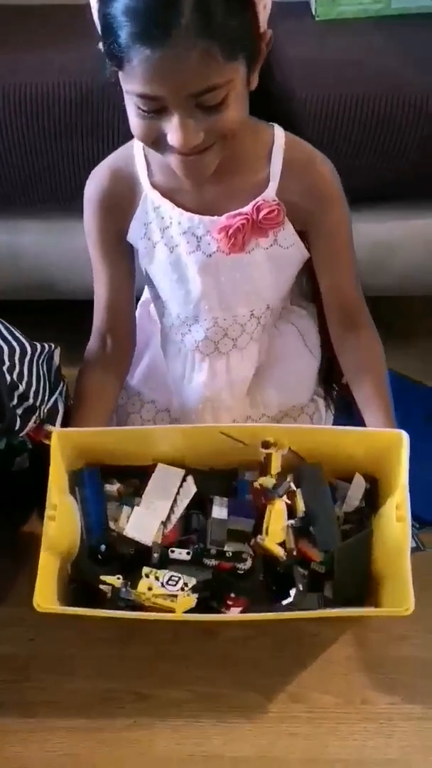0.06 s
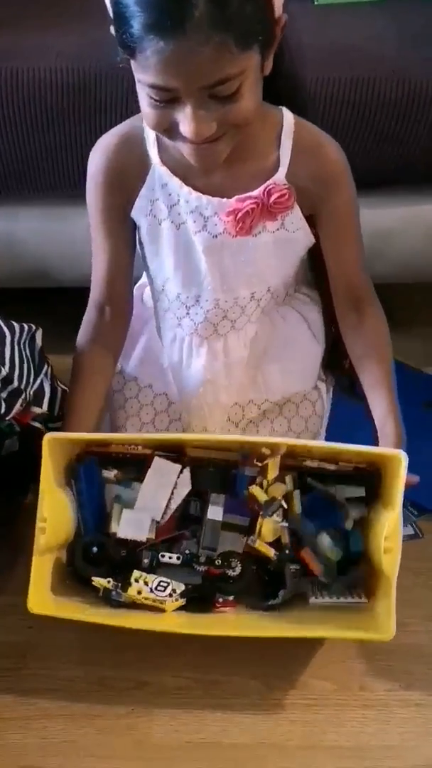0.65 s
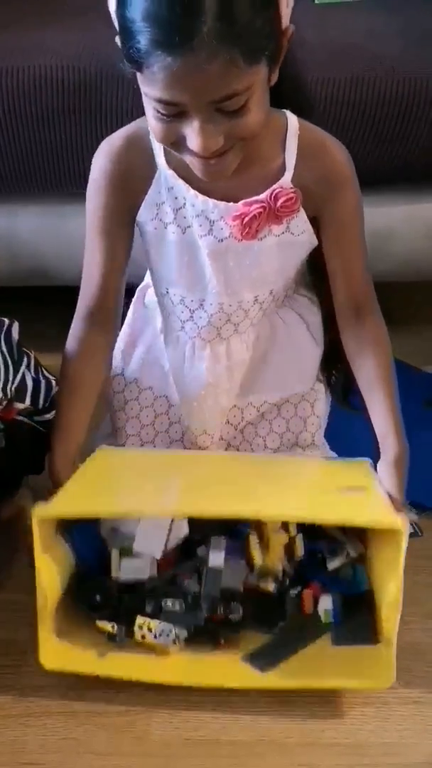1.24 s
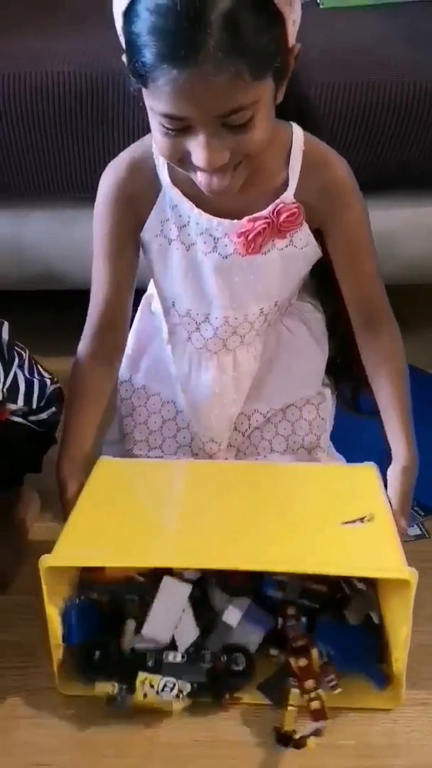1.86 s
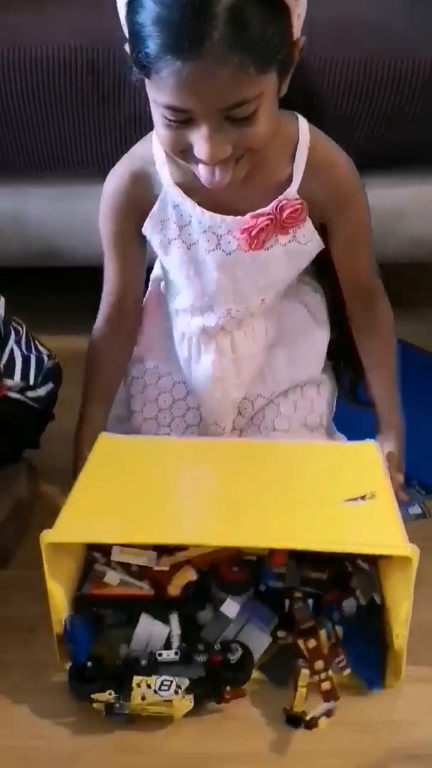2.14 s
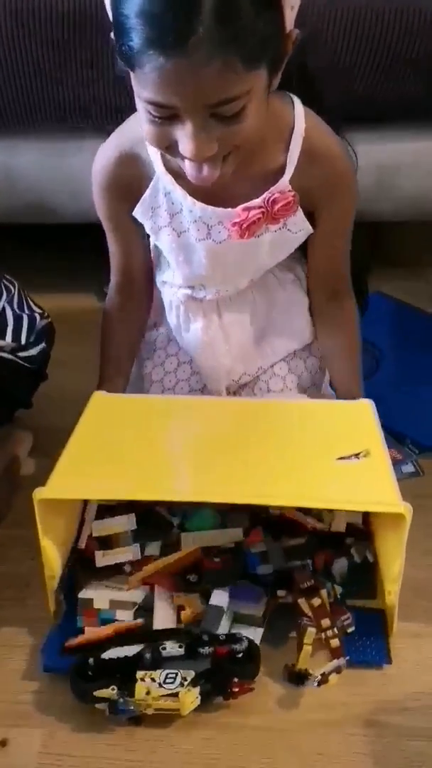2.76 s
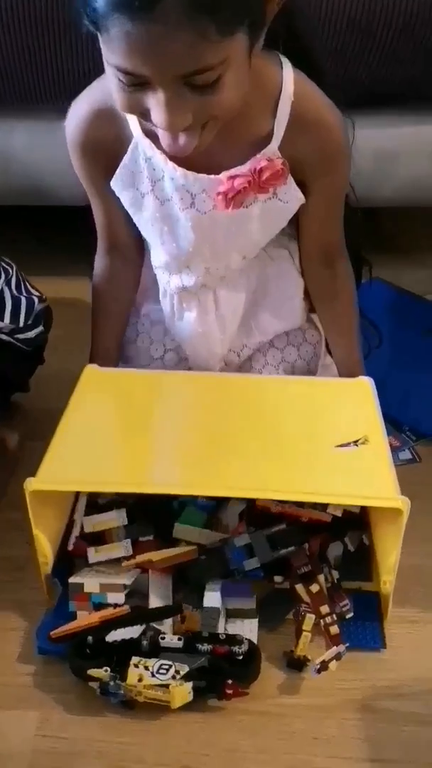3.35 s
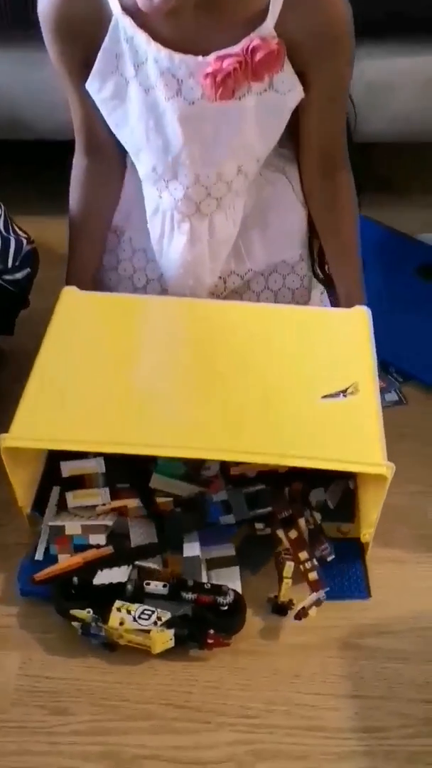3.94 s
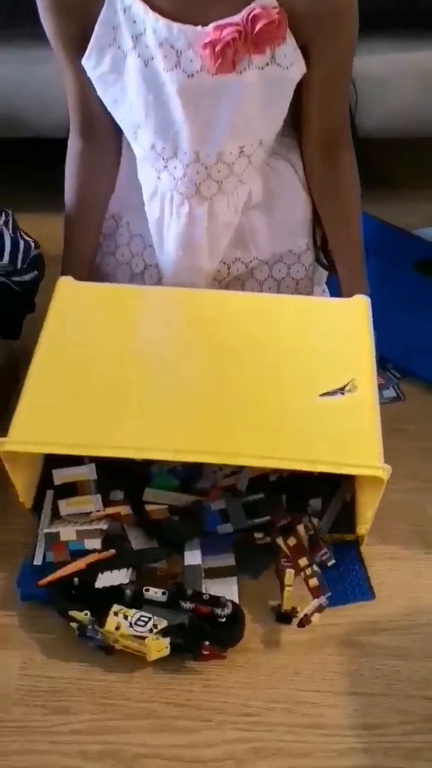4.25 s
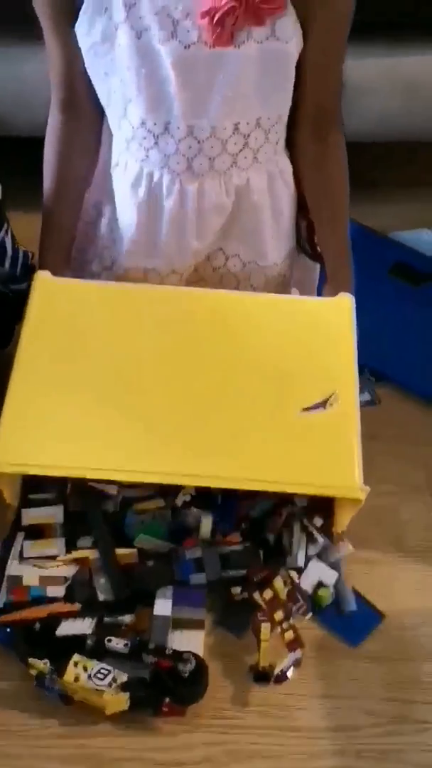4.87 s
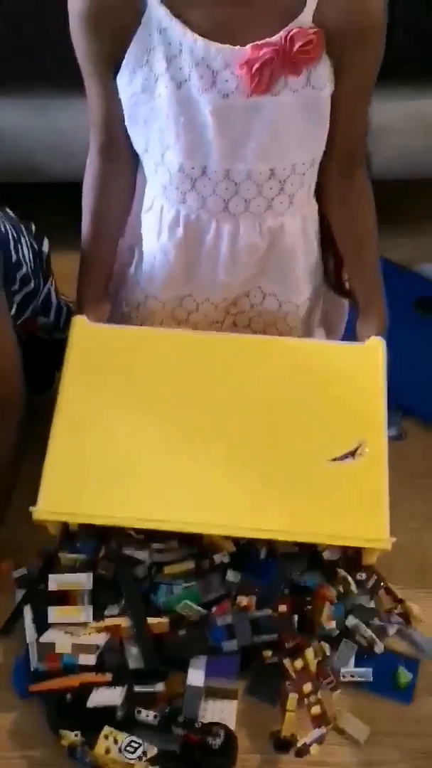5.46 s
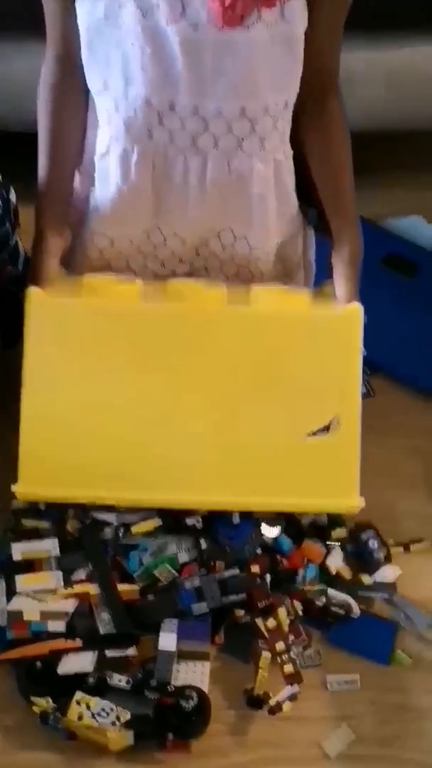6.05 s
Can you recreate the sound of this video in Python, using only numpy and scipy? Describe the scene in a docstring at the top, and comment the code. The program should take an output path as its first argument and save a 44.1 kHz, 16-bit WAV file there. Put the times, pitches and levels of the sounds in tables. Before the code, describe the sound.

Small plastic toy bricks rattle in a tipped plastic box, then clatter onto a wooden floor in two waves.

```python
"""Toy bricks slide out of a tipped plastic storage box and pour onto a wooden floor.
Every collision gives a hollow clack and a bright tick, drums on the box, and knocks on its wall and
on the floorboards. Each of these is a short burst of noise mixed with a few fading tones.
Some pieces ring on. The box rumbles and bumps in the hands, and a small living room
answers with a short echo over a faint hush."""
import sys
import numpy as np
from scipy import signal
from scipy.fft import rfft, irfft, next_fast_len
from scipy.io import wavfile

SR = 44100
rng = np.random.default_rng(int(sys.argv[2]) if len(sys.argv) > 2 else 0)


def transcribe(u):
    """Save the signal u as a 16-bit wav file named by the first command-line argument.

    u: samples, shape (n,) or (channels, n), limited to [-1, 1]; the rate is SR.
    q: integer samples, one column per channel.
    """
    v = np.clip(np.atleast_2d(u).T, -1, 1)
    q = np.round(v * 32767).astype(np.int16)
    wavfile.write(sys.argv[1], SR, q)


N = 269451
T = np.arange(N) / SR

# Tone colours of the box: its drumming, the hollow knock of its wall and its deep rumble.
# Each row: frequency in Hz, level in dB.
DRUM_SPECTRUM = [(60, -20), (100, -12), (165, -1.5), (230, -1), (290, 3.5), (340, 2), (420, -3),
                 (600, -23.5), (1000, -72.5)]
WALL_SPECTRUM = [(250, -39), (450, -9), (640, -3), (900, 4.5), (1300, -6), (1600, -18.5), (3000, -29)]
RUMBLE_SPECTRUM = [(10, 2), (25, -9), (45, -4.5), (70, -7), (110, -7), (180, -7), (400, -34), (1000, -79)]


def pour(parts, extra_per_s=130, least_per_s=160, moving_share=0.7, rebound_db=-1.5, contacts=3):
    """Collisions crowd together as the heap slides faster; each piece bounces in ever shorter hops."""
    flow_db = heap_levels(T)[0]
    per_s = least_per_s + extra_per_s * gain_of(0.5 * (flow_db - flow_db.max()))
    hits = np.flatnonzero(rng.random(N) < per_s / SR)  # the sample at which each collision starts
    hit_s = hits / SR
    surge_db = 0.7 * wander(13)[hits]  # the flow comes in uneven surges
    levels_db = part_levels(hit_s, *heap_levels(hit_s)) + surge_db
    weight, height, choice = rng.random((N, 3))[hits].T
    weight_db = 1.5 * np.minimum(-np.log1p(-weight), 4)  # many light blows, a few heavy ones
    which = (2 * hits / N + moving_share * choice) % 1  # only some pieces are moving at any time
    hop = np.arange(contacts)
    times = hit_s[:, None] + (0.003 + 0.014 * height[:, None]) * hop ** 0.8
    hop_sizes = gain_of(rebound_db * hop)
    hop_sizes /= np.linalg.norm(hop_sizes)
    window = np.hanning(int(0.172 * SR))
    out = np.zeros((2, N))
    for part, level_db, trim_db in zip(parts, levels_db, (-1.58, -1.19, -0.63, -3.46, -0.52)):
        sizes = gain_of(weight_db + 2.5 * rng.standard_normal(N)[hits])
        # the energy set free at each moment is shared among the collisions near it
        power = signal.oaconvolve(np.bincount(hits, sizes ** 2, N), window / window.sum(), "same")[hits]
        sizes = sizes * gain_of(level_db + trim_db) / np.sqrt(power)
        for hop_times, size, piece in zip(times, sizes, (which * len(part)).astype(int)):
            for s, hop_size in zip(hop_times, hop_sizes):
                add(out, s, size * hop_size * part[piece])
    return out


def landings(parts, graze_db=-11, settle_db=-8.5, gap_s=0.002, blow_s=0.009, contacts=4):
    """A tumbling piece grazes the heap with one corner, lands, then chatters more and more weakly."""
    # Single pieces that land. Each row: time in seconds, clack level in dB, tick level in dB.
    blows = [(.146, -75, -68), (0.163, -62, -57), (0.398, -57, -72), (0.431, -55, -61), (0.557, -46, -58),
             (0.675, -33, -40), (0.685, -45, -36), (0.699, -35, -43.5), (0.736, -39, -41),
             (0.799, -35, -39), (.807, -32, -34), (.834, -32.5, -28), (0.847, -30, -37), (.871, -36.5, -52),
             (.951, -23, -37), (0.968, -32, -50), (1.087, -30.5, -38), (1.111, -32, -33.5),
             (1.126, -35.5, -35.5), (1.141, -35, -43), (1.204, -34.5, -38), (1.228, -44, -40.5),
             (1.309, -54, -44), (1.334, -43, -67), (1.388, -31.5, -37.5), (1.415, -31, -33.5),
             (1.453, -26, -31), (1.474, -26.5, -31.5), (1.516, -28, -39), (1.527, -34, -38),
             (1.661, -37.5, -35), (1.709, -44.5, -27.5), (1.804, -37, -31), (1.892, -24.5, -36),
             (2.092, -26.5, -29), (2.131, -53, -30.5), (2.152, -27, -37), (2.225, -27.5, -32),
             (2.257, -22, -28), (2.332, -45, -44), (2.378, -39, -31), (2.466, -23.5, -32),
             (2.492, -29, -31), (2.509, -23, -31), (2.529, -32, -46), (2.62, -45, -32), (2.629, -46, -34),
             (2.644, -28.5, -40), (2.649, -29, -24), (2.665, -38, -30), (2.829, -36, -38),
             (2.848, -28.5, -37), (2.996, -36, -56), (3.062, -42, -41.5), (3.098, -42, -51),
             (3.147, -39.5, -44), (3.198, -42, -42), (3.219, -37, -41.5), (3.276, -37, -39.5),
             (3.292, -51, -56), (3.378, -40, -41), (3.389, -35, -39), (3.407, -51, -54), (3.425, -46, -44),
             (3.467, -49, -43), (3.474, -62, -48), (3.495, -43, -41.5), (3.526, -45, -46),
             (3.599, -39, -52), (3.614, -40.5, -43), (3.628, -37, -46.5), (3.688, -50, -37.5),
             (3.692, -39, -28), (3.712, -29.5, -51), (3.728, -41, -53), (3.742, -46, -42),
             (3.765, -53, -41.5), (3.828, -31, -33.5), (3.834, -35.5, -51), (3.844, -52, -55),
             (4.032, -30, -57), (4.101, -29, -37), (4.172, -37.5, -29.5), (4.298, -31, -43),
             (4.403, -44, -37), (4.467, -28, -49), (4.75, -26, -36), (4.782, -34, -35), (4.956, -39, -31),
             (5.058, -35, -29), (5.1, -42, -32.5), (5.112, -45, -33), (5.244, -56, -37), (5.258, -46, -36),
             (5.372, -48.5, -35.5), (5.513, -53, -34), (5.719, -40, -30), (6.031, -46, -48),
             (6.063, -41, -36)]
    out = np.zeros((2, N))
    contact = np.arange(contacts) - 1  # -1 is the graze, 0 the landing
    sizes = gain_of(np.where(contact < 0, graze_db, settle_db * contact))
    sizes *= np.sqrt(blow_s * SR) / np.linalg.norm(sizes)
    for s, clack_db, tick_db in blows:
        delays = gap_s * contact * rng.uniform(0.75, 1.25, contacts)
        for part, level_db in zip(parts, single_piece_levels(s, clack_db, tick_db)):
            for delay, size in zip(delays, sizes):
                add(out, s + delay, size * gain_of(level_db) * part[rng.integers(len(part))])
    return out


def rattles(parts, contacts=6):
    """Two pieces skitter against each other, sounding by turns in a quick, uneven run of contacts."""
    # Each row: start in seconds, length in seconds, clack level in dB, tick level in dB.
    skitters = [(0.486, 0.04, -46, -53), (0.591, 0.032, -48.5, -44), (0.822, 0.021, -33.5, -30),
                (0.93, 0.011, -33.5, -26), (1.611, 0.043, -36.5, -29.5), (1.733, 0.042, -33, -33),
                (1.951, 0.022, -30.5, -31), (2.207, 0.038, -35, -41), (2.577, .022, -31, -43),
                (2.655, 0.046, -36.5, -33.5), (2.912, 0.035, -41, -39), (3.307, 0.031, -41, -42),
                (3.702, 0.0054, -39, -47), (3.826, 0.0094, -42, -37), (3.964, 0.056, -41, -61),
                (4.27, 0.037, -30.5, -43), (4.355, 0.048, -33.5, -38), (4.634, 0.038, -32.5, -34.5),
                (5.712, 0.052, -59, -41.5)]
    out = np.zeros((2, N))
    for s, length_s, clack_db, tick_db in skitters:
        times = s + length_s * (np.arange(contacts) + rng.uniform(-0.4, 0.4, contacts)) / contacts
        sizes = gain_of(-2 * rng.standard_normal(contacts))
        sizes *= np.sqrt(length_s * SR) / np.linalg.norm(sizes)
        for part, level_db in zip(parts, single_piece_levels(s, clack_db, tick_db)):
            pair = rng.integers(len(part), size=2)
            for k, size in enumerate(sizes):
                add(out, times[k], size * gain_of(level_db) * part[pair[k % 2]])
    return out


def rings(detune=0.0353, tones=7):
    """Thin plates and rods ring on in a cluster of close tones that beat against one another."""
    # Pieces, and the hollow box itself, that ring after a blow.
    # Each row: start in seconds, pitch in Hz, level in dB, seconds to fade by 60 dB (called t60).
    ringing = [(.165, 6310, -48.5, 0.23), (0.164, 5500, -56, .3), (.165, 8950, -61, 0.42),
               (.4, 2250, -42, .05), (.558, 1610, -36, 0.077), (.676, 2420, -28.5, .04),
               (.69, 9200, -30, 0.026), (0.704, 9200, -33, 0.023), (1.506, 296, -28.5, 0.25),
               (1.516, 8850, -18, .02), (1.527, 8600, -21, .02), (1.57, 296.5, -29, 0.3),
               (1.665, 2270, -24.5, .06), (1.711, 9170, -24, 0.071), (1.749, 2100, -21.5, .06),
               (1.719, 303, -24.5, 0.11), (2.152, 2510, -19, 0.035), (2.219, 10350, -18.5, 0.084),
               (2.256, 10370, -15.5, 0.037), (2.265, 10250, -17, 0.042), (2.268, 2214, -18, 0.068),
               (2.285, 282, -28.5, .18), (2.377, 9560, -21.5, .06), (2.46, 9740, -23, 0.059),
               (2.519, 318, -27.5, 0.21), (2.7, 1300, -29.5, 0.27), (2.826, 2200, -28, .06),
               (2.859, 10350, -29, 0.02), (2.937, 2110, -25, .06), (2.876, 10200, -21.5, 0.031),
               (3.377, 9500, -33.5, .05), (3.467, 9340, -27, 0.011), (3.476, 9600, -33, .012),
               (3.692, 2920, -27, 0.07), (3.711, 1300, -24.5, 0.033), (3.741, 2870, -33, 0.2),
               (3.83, 1300, -28.5, 0.097), (4.033, 2170, -23, 0.084), (4.354, 7900, -30, .08),
               (4.363, 9400, -22.5, 0.084), (4.577, 1306, -27, 0.17), (4.664, 2060, -27, 0.072),
               (4.67, 310, -28, 0.25), (4.698, 4540, -25, 0.06), (4.702, 9350, -31, 0.055),
               (4.822, 9300, -24, 0.046), (4.84, 304, -34, .2), (4.871, 8140, -28, 0.046),
               (4.95, 9560, -22.5, .05), (4.957, 1750, -19.5, 0.054), (5, 2100, -25, 0.053),
               (5.005, 313.6, -30, 0.41), (5.031, 1890, -23, 0.061), (5.062, 2490, -26, 0.11),
               (5.096, 8030, -29.5, 0.081), (5.144, 1860, -28, 0.098), (5.199, 315.5, -34, 0.22),
               (5.242, 8300, -19.5, 0.03), (5.258, 8200, -22, 0.034), (5.318, 1720, -32, 0.14),
               (5.393, 1870, -30, 0.065), (5.492, 1726, -31.5, 0.3), (5.555, 1770, -32, 0.039),
               (5.626, 7920, -31, 0.22), (5.65, 9140, -30, 0.19), (5.716, 8350, -26, .06),
               (6.069, 273, -32, 0.37)]
    out = np.zeros((2, N))
    for s, hz, level_db, t60 in ringing + stray_rings():
        t = np.arange(int(t60 * SR) + 64) / SR
        offsets = 2 * (np.arange(tones) + rng.random(tones)) / tones - 1
        close_hz = hz * (1 + detune * offsets[:, None])
        phase = 1.44 * rng.standard_normal((tones, 1)) + rng.random((2, tones, 1))
        fade = gain_of(-60 * t / t60) * (1 - np.exp(-t / 0.0002))
        cluster = unit_energy(fade * np.sin(2 * np.pi * close_hz * t + phase).sum(1))
        add(out, s, gain_of(level_db) * np.sqrt(np.sum(fade ** 2) / 2) * cluster)
    return out


def stray_rings(per_s=44, above_heap_db=1, t60=0.045, large_hz=(1200, 2780), small_hz=(6950, 10800)):
    """Sliding pieces that happen to ring, large and small by turns, as extra rows for rings()."""
    rows = []
    for k, (jitter, pitch) in enumerate(rng.random((300, 2))):
        s = (k + jitter) / per_s
        low_hz, high_hz = (large_hz, small_hz)[k % 2]
        if s < T[-1]:
            level_db = heap_levels(s)[k % 2] + above_heap_db  # large follow the clack, small the tick
            rows.append((s, low_hz + pitch * (high_hz - low_hz), level_db, t60))
    return rows


def collision_parts(blur, scatter_db):
    """Sets of clacks, ticks, box drums, wall knocks and floor knocks. Blur softens and lengthens some."""
    # Tone colours of a brick's hollow clack, its bright tick and the floorboards under it.
    # Each row: frequency in Hz, level in dB.
    clack_spectrum = [(300, -19.5), (480, -7.5), (600, -23), (900, -4), (1100, -4), (1300, -9),
                      (1600, -7.5), (1900, 1), (2200, 3), (2500, -3), (2800, -5.5), (3100, -4.5),
                      (4000, -11.5), (7000, -23.5)]
    tick_spectrum = [(1800, -21.5), (3200, -3.5), (4100, -2), (5100, -1.5), (7000, 0.5), (8400, -1),
                     (9300, 3), (9900, -5.5), (10600, -7.5), (11300, -9), (12600, -14), (14000, -14),
                     (15500, -18)]
    floor_spectrum = [(500, -27.5), (900, -15), (1250, 0), (1750, 1.5), (2100, -4), (2700, -6), (3300, -4),
                      (6000, -43)]
    clacks = impacts(clack_spectrum, (1203, 2816), t60=0.034 * blur, rise_s=0.00018 * blur, ring_db=-2,
                     scatter_t60=0.041, scatter_db=scatter_db, width=0.46, trim_db=2)
    ticks = impacts(tick_spectrum, (3190, 10800), t60=0.013 * blur, rise_s=0.00038 * blur, ring_db=-2.5,
                    scatter_t60=0.044, scatter_db=scatter_db, width=0.73, trim_db=3)
    drums = impacts(DRUM_SPECTRUM, (243, 351.6), t60=0.09, rise_s=0.00019, ring_db=-22,
                    scatter_t60=0.025, scatter_db=2, width=0.18, trim_db=0.17, count=60, samples=6144)
    walls = impacts(WALL_SPECTRUM, (480, 1510), t60=0.056 * blur, rise_s=0.000074, ring_db=-0.5,
                    scatter_t60=0.044, scatter_db=scatter_db, width=0.79, trim_db=0.5, count=100)
    floors = impacts(floor_spectrum, (1138, 1894), t60=0.014 * blur, rise_s=0.00034, ring_db=-10.5,
                     scatter_t60=0.026, scatter_db=scatter_db, width=0.41, trim_db=-3, count=100)
    return clacks, ticks, drums, walls, floors


def impacts(spectrum, range_hz, t60, rise_s, ring_db, scatter_t60, scatter_db, width, trim_db,
            crack_t60=0.0079, count=520, tones=3, samples=1536):
    """Many unlike stereo blows: each a short crack, its scatter through the heap and a few tones."""
    t = np.arange(samples) / SR
    hz = rng.uniform(*range_hz, (count, tones, 1))
    tone_t60 = t60 * rng.uniform(0.34, 2.52, hz.shape)
    fading_tones = np.sin(2 * np.pi * hz * t) * gain_of(-60 * t / tone_t60)
    ring = rng.standard_normal((count, 3, tones)) @ fading_tones  # three mixes: shared, left, right
    crack_fade = gain_of(-60 * t / crack_t60) + gain_of(scatter_db - 60 * t / scatter_t60)
    crack = rng.standard_normal(ring.shape) * crack_fade
    rise = 1 - np.exp(-t / rise_s)  # scattering through the heap softens the attack
    blows = rise * (crack / crack.std() + gain_of(ring_db) * ring / ring.std())
    shared, left, right = blows.swapaxes(0, 1)
    sides = rfft(np.stack([shared + width * left, shared + width * right], 1), 2 * samples)
    bin_hz = np.fft.rfftfreq(2 * samples, 1 / SR)
    left_delay_s = rng.uniform(0.00005, 0.00014, (count, 1))  # the heap lies to the right
    sides[:, 0] *= np.exp(-2j * np.pi * bin_hz * left_delay_s)
    coloured = irfft(sides * rfft(colour_filter(spectrum), 2 * samples))[..., :samples]
    return [gain_of(trim_db) * unit_energy(pair) for pair in coloured]


def heap_levels(s):
    """Clack, tick and drum levels at time s. Small pieces tick more; those still in the box drum on it."""
    # The heap shifts, pours, eases and pours again. Each row: time in seconds, clack level in dB,
    # then ticking and drumming, both in dB above the clack.
    flow = [(0, -57, -1, 14.5), (.1, -64, -18, 12), (.33, -69, -2, -4), (.44, -53.5, -11.5, 3.5),
            (.5, -50, 0.5, -7), (.77, -43.5, -10, -6.5), (.86, -43.5, -17, 2), (1.05, -43, -13.5, -3.5),
            (1.37, -42, -3.5, -1.5), (1.51, -32.5, 1.5, -6.5), (1.85, -33, -0.5, -3.5),
            (2.13, -30, -2, -7.5), (2.55, -27.5, -5.5, -12), (2.92, -39, -2, -15), (3, -43.5, -8, -17),
            (3.3, -47.5, -2.5, -6), (3.6, -48.5, -5, -10.5), (3.89, -38.5, -2.5, -10.5),
            (4.08, -30, -4, -9.5), (4.3, -31, 0, -8.5), (4.5, -32, -2.5, -5), (4.75, -30, -1.5, -7),
            (5.12, -32.5, -2.5, -9), (5.42, -38, 0.5, -8.5), (5.9, -40.5, 1, -7.5), (6.11, -33, -3, -5)]
    times, *columns = np.transpose(flow)
    clack_db, tick_offset_db, drum_offset_db = (np.interp(s, times, column) for column in columns)
    return clack_db, clack_db + tick_offset_db, clack_db + drum_offset_db


def single_piece_levels(s, clack_db, tick_db):
    """The five levels for one piece, which drums the box 8 dB less than the sliding heap does."""
    flow_db, _, drum_db = heap_levels(s)
    return part_levels(s, clack_db, tick_db, clack_db + drum_db - flow_db - 8)


def part_levels(s, clack_db, tick_db, drum_db):
    """Adds wall and floor levels to the other three. Large, dull pieces knock hardest on the box wall."""
    # The wall sounds most while pieces tumble inside the box. Each row: time in seconds, gain in dB.
    wall_gains = [(1, -4), (1.4, -8.5), (3.1, -12), (3.8, -7.5), (4.05, -3), (6, -8)]
    # The more bricks clear the rim, the more the floorboards sound.
    # Each row: time in seconds, level in dB compared with the clack.
    floor_gains = [(.9, -3), (1.6, -16), (2.1, -9), (2.6, -7), (3.1, -13), (3.7, -6), (4, -12), (4.2, -1.5),
                   (5, -5.5), (5.9, -16)]
    dull_db = np.clip(clack_db - tick_db, -10, 10)
    wall_db = (clack_db + drum_db) / 2 + np.interp(s, *np.transpose(wall_gains)) + 0.24 * dull_db
    floor_db = clack_db + np.interp(s, *np.transpose(floor_gains))
    return clack_db, tick_db, drum_db, wall_db, floor_db


def box_bumps(rise_share=0.17, rattle_db=3, wall_db=-10):
    """Each bump swells quickly and dies away, shaking the floor while the load rattles in the box."""
    # The box is gripped, flexes and bumps on the floor.
    # Each row: start in seconds, length in seconds, rumble level in dB, drumming level in dB.
    bumps = [(0, 0.025, -45, -43), (0.041, 0.28, -42, -51.5), (0.43, 0.21, -45.5, -50),
             (0.795, 0.06, -52, -34.5), (.873, 0.1, -46, -40), (0.951, 0.064, -56, -34),
             (1.012, 0.058, -56, -37.5), (1.467, 0.16, -49, -45), (1.647, 0.19, -55, -40),
             (1.717, 0.048, -50, -34), (1.76, 0.049, -50, -50), (1.857, 0.071, -28.5, -33),
             (2.276, 0.084, -38, -29.5), (2.354, 0.03, -51, -28.5), (2.509, 0.058, -56, -43),
             (3.902, 0.26, -47, -43.5), (4.003, 0.17, -53.5, -33.5), (4.29, 0.065, -44, -33),
             (4.36, .051, -36, -39), (4.448, 0.038, -34, -50), (4.654, 0.1, -39, -39),
             (4.86, 0.053, -35, -39), (4.98, 0.17, -48, -39.5), (5.14, 0.12, -57, -35),
             (5.18, 0.11, -43, -42), (5.953, 0.1, -65, -43), (6.05, 0.18, -50, -48)]
    rumble_gain, drum_gain = np.zeros((2, N))
    for s, length_s, rumble_db, drum_db in bumps:
        age = np.maximum(T - s, 0) / (rise_share * length_s)
        swell = age * np.exp(1 - age)
        rumble_gain += gain_of(rumble_db) * swell
        drum_gain += gain_of(drum_db) * swell
    drum_gain *= gain_of(rattle_db * (np.tanh(wander(70)) - 0.5))
    rumble = coloured_noise(RUMBLE_SPECTRUM)
    drumming = coloured_noise(DRUM_SPECTRUM) + gain_of(wall_db) * coloured_noise(WALL_SPECTRUM)
    return rumble_gain * rumble + drum_gain * drumming


def box_rumble():
    """The box flexes and drags as its load slides: a deep, uneven rumble that follows the drumming."""
    drum_db = heap_levels(T)[2]
    level_db = -48 + 0.46 * (drum_db - drum_db.max())
    return coloured_noise(RUMBLE_SPECTRUM) * gain_of(level_db + 1.5 * wander(60))


def room_echoes(sound, gap_s=0.0038, turn_s=0.09, patterns=4, samples=15000):
    """Dense reflections that die band by band; their pattern changes as the blows move about the heap."""
    # The living room's echo. Each row: frequency in Hz, seconds to fade by 60 dB.
    fade_times = [(150, 0.021), (600, 0.26), (2000, 0.38), (8000, 0.42), (15000, 0.11)]
    shape = (patterns, 2, samples)
    reflections = rng.standard_normal(shape) * (rng.random(shape) < 0.12)
    hz, t, bands = signal.stft(reflections, SR, nperseg=256)
    fade = gain_of(-60 * t / value_at(fade_times, hz)[:, None])
    tails = signal.istft(bands * fade, SR, nperseg=256)[1]
    tails *= np.arange(tails.shape[-1]) > gap_s * SR
    tails /= np.linalg.norm(tails, axis=-1, keepdims=True)
    echo = np.zeros((2, N))
    for k, tail in enumerate(tails):
        turns_away = abs((T / turn_s - k) % patterns - patterns / 2)
        echo += convolve(sound * np.sqrt(np.maximum(1 - turns_away, 0)), tail)
    # long waves reach both sides alike
    high_pass = signal.butter(2, 430, "high", fs=SR, output="sos")
    side = signal.sosfilt(high_pass, (echo[0] - echo[1]) / 2)
    return echo.mean(0) + np.array([side, -side])


def room_hush(level_db=-60.5):
    """The faint steady hush of the room."""
    # Tone colour of the quiet room. Each row: frequency in Hz, level in dB.
    hush_spectrum = [(30, 11), (100, -40), (300, -1.5), (700, -25), (2000, -21), (8000, -18), (15000, -78)]
    white = rng.standard_normal(N) + 0.5 * rng.standard_normal((2, N))
    hush = convolve(white, colour_filter(hush_spectrum))
    return gain_of(level_db) * hush / hush.std()


def gain_of(db):
    """Turns decibels into a factor to multiply by."""
    return 10 ** (np.asarray(db) / 20)


def value_at(points, hz):
    """Reads between a table's rows along straight lines on a log-frequency axis."""
    row_hz, values = np.transpose(points)
    return np.interp(np.log(hz + 1), np.log(row_hz + 1), values)


def add(mix, s, sound):
    """Mixes a stereo sound in at s seconds."""
    span = mix[:, max(round(s * SR), 0):][:, :sound.shape[1]]
    span += sound[:, :span.shape[1]]


def unit_energy(pair):
    """Scales a stereo sound to an average energy of 1 a side."""
    return pair / np.sqrt(np.sum(pair ** 2) / 2 + 1e-20)


def convolve(sound, response):
    """Filters a sound and keeps its length."""
    filtered = signal.oaconvolve(np.atleast_2d(sound), np.atleast_2d(response), axes=1)
    return filtered[:, :np.shape(sound)[-1]]


def colour_filter(spectrum, size=4096):
    """A filter with the given tone colour that makes no sound ahead of its input."""
    hz = abs(np.fft.fftfreq(size, 1 / SR))
    log_gain = np.log(gain_of(np.maximum(value_at(spectrum, hz), -100)))
    return np.fft.ifft(np.exp(np.conj(signal.hilbert(log_gain)))).real[:size // 2]


def coloured_noise(spectrum):
    """Noise of level 1 with the given tone colour."""
    noise = convolve(rng.standard_normal(N), colour_filter(spectrum))
    return noise / noise.std()


def wander(per_s):
    """A random curve that glides to a new value per_s times a second."""
    steps = rng.standard_normal(1024)
    return np.interp(T * per_s, np.arange(len(steps)), steps)


def scene(echo_db=-5):
    """Bricks, their echo in the room, the handled box and the quiet background."""
    buried = collision_parts(blur=1, scatter_db=1.5)  # deep in the heap, blows blur and scatter
    on_top = collision_parts(blur=0.55, scatter_db=-9)  # on top they are short and dry
    bricks = landings(on_top) + rattles(on_top) + pour(buried) + rings()
    return bricks + gain_of(echo_db) * room_echoes(bricks) + box_rumble() + box_bumps() + room_hush()


def record(dry, cutoff_hz=15350):
    """Gives each side its own tone colour, delays the left a little and cuts the highest treble."""
    # The right side is the brighter. Each row: frequency in Hz, left level minus right level in dB.
    balance = [(200, 0.5), (420, -1.5), (750, 4.5), (950, -0.5), (1250, 3.5), (1650, 1), (2000, -2.5),
               (2550, -5.5), (3000, 2), (4200, -2.5), (5400, -2.5), (8200, -1.5), (9400, -16), (10500, -14),
               (13000, -6)]
    # The left side hears the low notes later. Each row: frequency in Hz, lag in radians.
    left_lag = [(60, 0), (300, 0.4), (480, 1), (900, 1), (1300, 0.55), (2000, 0.067), (2600, 0.15),
                (15000, 0.28)]
    size = next_fast_len(N)
    hz = np.fft.rfftfreq(size, 1 / SR)
    tilt = gain_of(value_at(balance, hz))
    left = tilt * np.exp(-1j * value_at(left_lag, hz))
    sides = np.array([left, np.ones_like(tilt)]) * np.sqrt(2 / (1 + tilt ** 2))
    heard = irfft(rfft(dry, size) * sides, size)[:, :N]
    low_pass = signal.firwin(255, cutoff_hz, window=("kaiser", 9), fs=SR)
    return signal.oaconvolve(heard, low_pass[None], "same")


dry = scene()
out = record(dry)
transcribe(out)
```